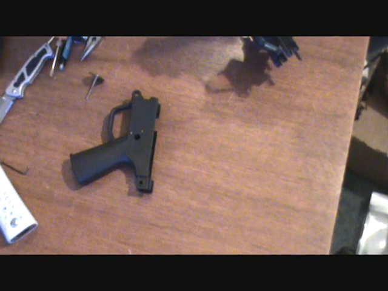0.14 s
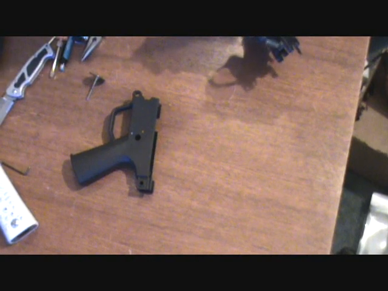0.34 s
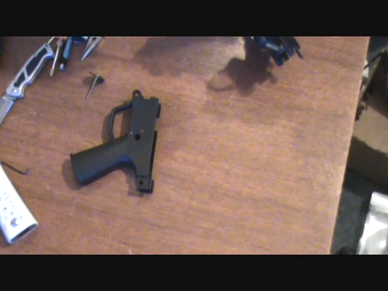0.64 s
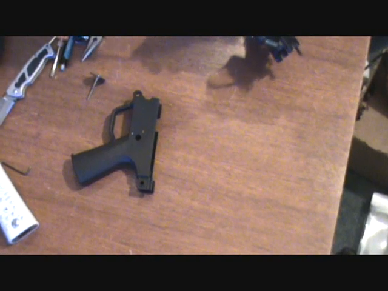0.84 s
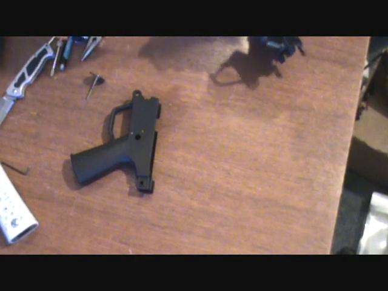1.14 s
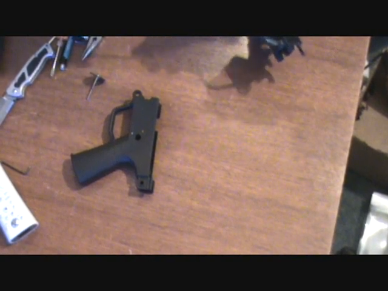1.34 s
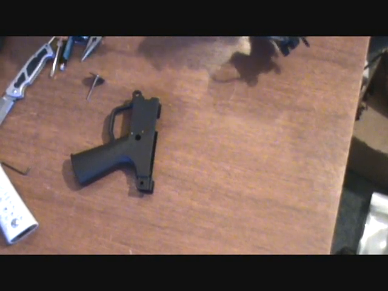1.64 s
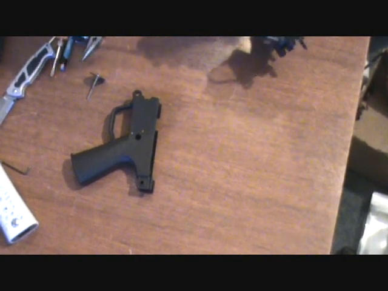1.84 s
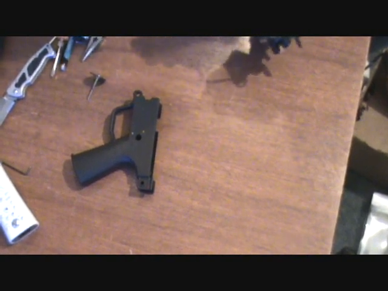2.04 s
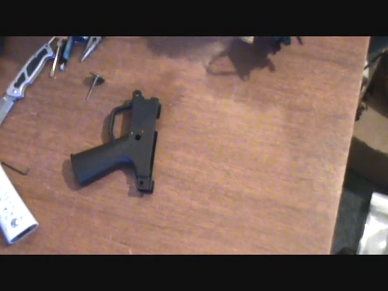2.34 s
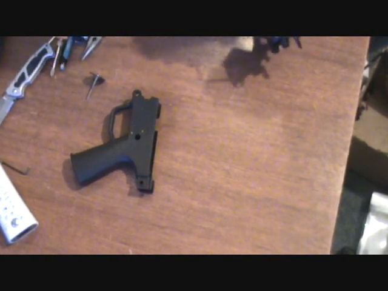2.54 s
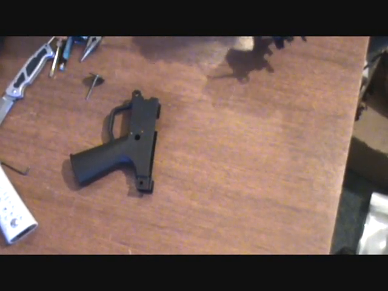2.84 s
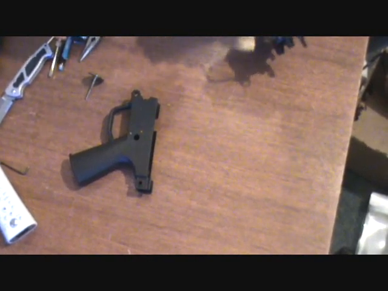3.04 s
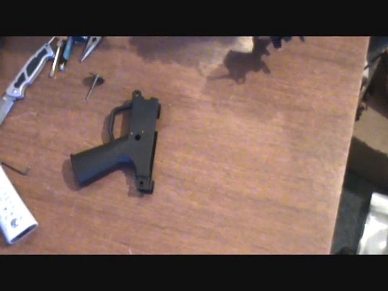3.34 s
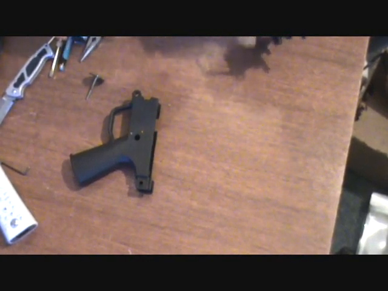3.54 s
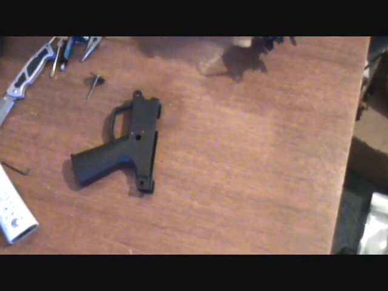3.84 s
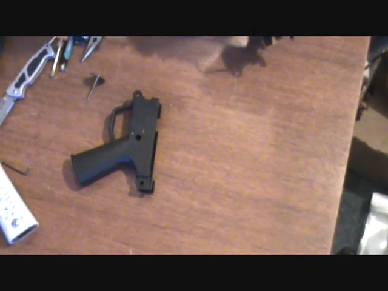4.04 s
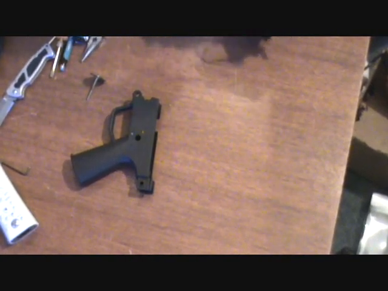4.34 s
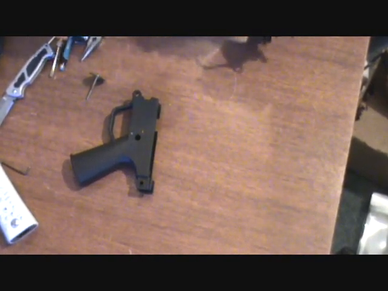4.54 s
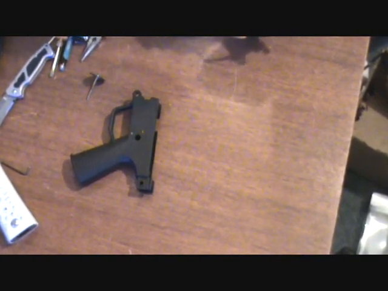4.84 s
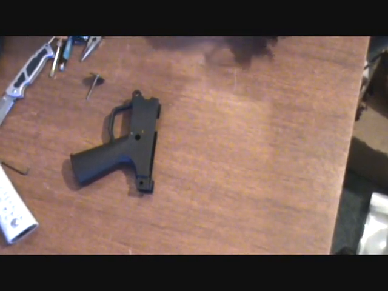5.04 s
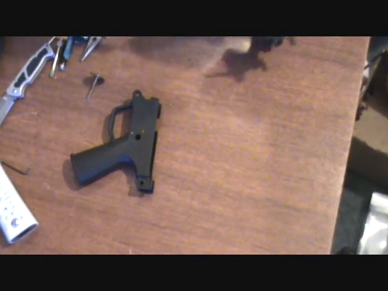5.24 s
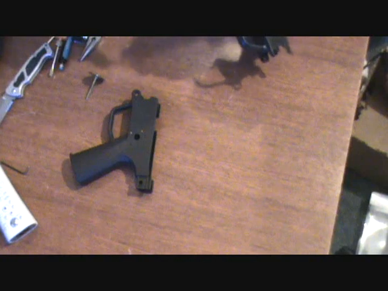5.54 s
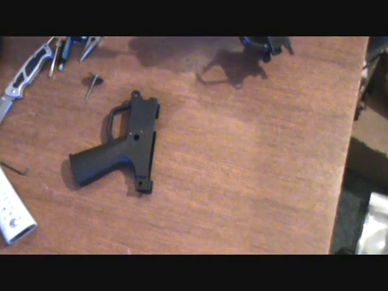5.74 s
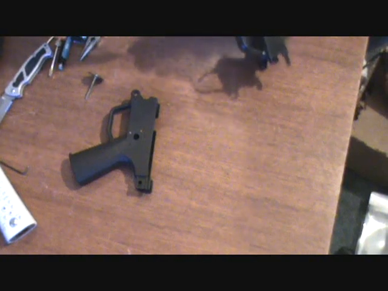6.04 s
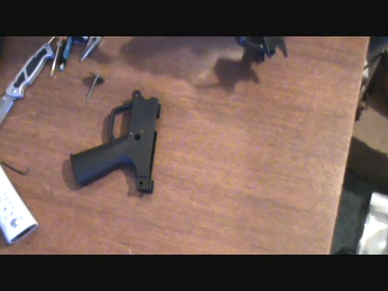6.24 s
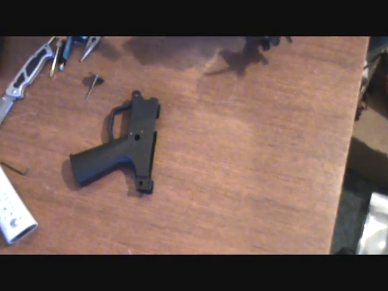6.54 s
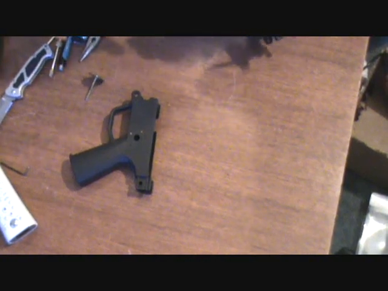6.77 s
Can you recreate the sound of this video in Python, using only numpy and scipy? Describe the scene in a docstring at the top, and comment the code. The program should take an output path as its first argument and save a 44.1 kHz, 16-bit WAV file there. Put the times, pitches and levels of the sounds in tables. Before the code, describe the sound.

A quiet small room with a steady, wide computer-fan rush, faint unsteady motor tones and light hiss. Close up, hands handle hollow steel parts over a wooden table. After a faint slide and finger rustle, a sharp bright click lands at 0.8 s, then clicks at about 1.6 and 1.8. A far vehicle's low hum swells slightly, then is gone by 3.2. A soft table knock and thud come at 2.2. From 2.7 to 3.2 scrapes and clicks crowd together; a strong hollow snap follows at 3.4 and another click at 3.75. Firm clicks fall at 4.5, 4.7 and 4.8. Between 5.0 and 5.25 there is a quick rattle of small ticks and a slide ending in a hard click, with a faint bump. Things calm, with a soft thud near 6.0, a small cluster of light ticks at 6.2-6.4, and faint scraping to the end at about 7.

```python
"""Steel parts at a wooden table

Close by, in a small room, hands fit steel rifle parts together above a wooden table. Filtered slips make
the slides; spikes and damped modes make the ticks and sharp clicks, which bounce off table top and walls.
Shaped noise and unsteady tones make a computer fan nearby; a gliding tone and low noise, a vehicle far
outside. Soft table bumps are decaying low noise, and the fingers' grip is grainy hiss."""
import sys
import numpy as np
from scipy import signal
from scipy.fft import rfft, irfft, next_fast_len
from scipy.io import wavfile
from scipy.ndimage import map_coordinates

SR = 44100
rng = np.random.default_rng(int(sys.argv[2]) if len(sys.argv) > 2 else 0)


def pcm_store(signal):
    """Save signal as 16-bit PCM."""
    levels = np.round(np.clip(np.atleast_2d(signal), -1, 1) * 32767)
    wavfile.write(sys.argv[1], SR, levels.astype(np.int16).T)


N = 304593
TIME = np.arange(N) / SR  # s
AGE = np.arange(SR // 3) / SR  # time since a contact, s

# steel sliding on steel:
# (start [s], end [s], relative level [dB], boost of the highs [dB])
SLIDES = [(0.219, 0.462, -62.5, -15), (.55, 0.663, -52.5, -5), (1.049, 1.163, -58.5, -10),
          (1.451, 1.555, -53, -11), (1.718, 1.815, -51, -20), (2.379, 2.482, -54, 1),
          (2.686, 2.772, -40.5, -3), (2.826, 2.905, -49, -5), (2.989, 3.147, -42.5, -5.5),
          (3.238, 3.388, -51, -5), (3.569, 3.747, -50.5, -5), (4.027, 4.311, -53, -12),
          (4.407, 4.49, -51, -20), (4.967, 5.068, -52.5, 0), (5.11, 5.234, -43.5, -11),
          (5.32, 5.406, -48.5, -3), (5.46, 5.584, -52, -6), (5.763, 5.845, -52, -7), (5.9, 5.98, -57, -12),
          (6.421, 6.519, -56, -7), (6.692, 6.778, -62, 7)]
# how long the room rings: (frequency [Hz], t60 [s])
ROOM = [(300, 0.22), (1000, 0.27), (2300, 0.22), (5000, 0.22), (9000, .18), (14000, 0.18)]


def amp(db):
    """Decibels to gain."""
    return 10 ** (np.asarray(db) / 20)


def unit(x):
    """x at rms 1."""
    return x / np.sqrt(np.mean(x ** 2) + 1e-20)


def pulse(x):
    """x with energy 1 per channel, averaged over the channels."""
    return x / np.sqrt(np.mean(np.sum(x ** 2, axis=-1)))


def along(points, hz):
    """(Hz, value) points read on a log frequency axis."""
    f, v = np.transpose(points)
    return np.interp(np.log(hz + 1), np.log(f), v)


def fade(t60):
    """A decay that loses 60 dB in t60 seconds."""
    return np.exp(-np.log(1000) * AGE / t60)


def wobble(rate):
    """A smooth random curve, rate knots a second."""
    knots = rng.standard_normal(int(N * rate / SR) + 4)
    return map_coordinates(knots, [TIME * rate])


def coloured(x, db_at):
    """x through the causal (minimum-phase) filter whose gain is db_at(Hz)."""
    size = 2 * next_fast_len(x.shape[-1])
    gain = amp(db_at(np.fft.rfftfreq(size, 1 / SR)))
    cepstrum = irfft(np.log(gain))
    # folding the cepstrum forward in time makes the filter causal
    cepstrum[1:size // 2] *= 2
    cepstrum[size // 2 + 1:] = 0
    response = np.exp(rfft(cepstrum))
    return irfft(rfft(x, size) * response)[..., :x.shape[-1]]


def add(track, s, sound):
    """Mix a stereo sound into the track at s seconds."""
    part = track[:, max(round(s * SR), 0):][:, :sound.shape[1]]
    part += sound[:, :part.shape[1]]


def room_tone(air_db=-54.5, waver_db=1.0, drift=0.84):
    """Fan rush and microphone hiss as one wide noise, with slightly unsteady motor tones."""
    # spectrum of the rush and hiss: (frequency [Hz], relative level [dB per Hz])
    air_spectrum = [(20, -20), (35, -12), (55, -15.5), (86, -15.5), (115, -11), (187, -11), (265, -6.5),
                    (420, -12.5), (650, -13.5), (950, -12.5), (1450, -17.5), (2300, -18), (3200, -21.5),
                    (7500, -27), (10500, -26), (16000, -29)]
    # left-right likeness of that noise: (frequency [Hz], correlation [0 to 1])
    air_likeness = [(50, 0.99), (130, 0.82), (260, 0.81), (520, 0.32), (1000, 0.098), (2200, 0.1),
                    (5000, 0.3), (12000, 0.77)]
    # fan and drive tones: (frequency [Hz], rms level before the waver [dB])
    fan_tones = [(37, -81), (51.8, -64), (70, -82), (264, -73), (466, -77.5), (514, -75.5), (754, -72),
                 (843, -78), (904, -71), (1184, -72.5), (1961, -70.5), (2261, -72.5)]

    def side_db(hz):
        alike = np.clip(along(air_likeness, hz), 0, .995)
        return along(air_spectrum, hz) + 10 * np.log10((1 - alike) / (1 + alike))

    mid_noise, side_noise = rng.standard_normal((2, N))
    mid = coloured(mid_noise, lambda hz: along(air_spectrum, hz))
    side = coloured(side_noise, side_db)
    air = amp(air_db) * unit(np.array([mid + side, mid - side]))
    for hz, db in fan_tones:
        unsteady = min(hz / 900, 1)  # high orders magnify small changes of speed
        phase = 2 * np.pi * hz * TIME + drift * unsteady * wobble(9)
        level = amp(db + waver_db * unsteady * wobble(3.65))
        air += level * unit(np.sin(phase))
    return air


def far_engine(rise_s=0.69, end_s=3.2, fall_s=.3, rumble_db=-62):
    """Only the firing note and a low rumble come through the wall; the note rises, then sags."""
    # the firing note: (time [s], pitch [Hz], level before the fade in and out of earshot [dB])
    firing_note = [(.4, 113, -86), (1, 114.4, -68), (2.1, 121, -65), (2.35, 121.5, -61),
                   (2.7, 110.8, -66.5), (2.95, 108.5, -68)]
    # the rumble through the wall: (frequency [Hz], relative level [dB per Hz])
    rumble_spectrum = [(100, -51), (170, -8.5), (210, 3), (255, 1), (330, -14.5), (700, -28), (2000, -64)]
    s, hz, note_db = np.transpose(firing_note)
    phase = 2 * np.pi * np.cumsum(np.interp(TIME, s, hz)) / SR
    note = amp(np.interp(TIME, s, note_db)) * unit(np.sin(phase))
    noise = rng.standard_normal(N)
    rumble = amp(rumble_db) * unit(coloured(noise, lambda f: along(rumble_spectrum, f)))
    earshot = np.clip(np.minimum(TIME / rise_s, (end_s - TIME) / fall_s), 0, 1)
    return earshot * (note + rumble)


def bumps(thud_t60=0.16, knock_t60=.05, soft_s=0.0012):
    """A padded blow makes the table top thud and knock; each microphone hears it a little differently."""
    # soft bumps on the table: (time [s], thud level [dB], wooden knock level [dB])
    table_bumps = [(2.225, -56, -47), (2.242, -67, -50.5), (2.27, -51, -60), (5.2, -56, -57),
                   (5.972, -58, -56.5), (6.028, -57, -80)]
    # the table top, each: (frequency [Hz], relative level [dB per Hz])
    thud_spectrum = [(60, -49), (130, -6), (190, -4.5), (300, -16.5), (600, -22), (2000, -72)]
    knock_spectrum = [(150, -21), (400, -6.5), (650, -4), (1100, -9.5), (1700, -16.5), (4000, -27.5),
                      (10000, -39)]
    track = np.zeros((2, N))
    for s, thud_db, knock_db in table_bumps:
        thud = thud_spectrum, thud_db, thud_t60
        knock = knock_spectrum, knock_db, knock_t60
        for spectrum, db, t60 in (thud, knock):
            decay = fade(t60) + .3 * fade(along(ROOM, 400))  # the board, then the room
            envelope = decay * (1 - np.exp(-AGE / soft_s))
            shared = rng.standard_normal(len(AGE))
            apart = 0.3 * rng.standard_normal((2, len(AGE)))
            board = coloured((shared + apart) * envelope, lambda hz: along(spectrum, hz))
            add(track, s, amp(db) * np.sqrt(SR / 20) * pulse(board))  # level over 50 ms
    return track


def fingers(grain_db=3, brush_s=0.15):
    """Fingertips shifting their grip on the steel give short swells of grainy hiss."""
    # shifts of grip: (time of the peak [s], level at the peak [dB])
    grip_shifts = [(.1, -61.5), (1.42, -59), (2.06, -57.5), (2.24, -62.5), (2.66, -55.5), (4.01, -57.5)]
    # dry skin on steel: (frequency [Hz], relative level [dB per Hz])
    skin_spectrum = [(1000, -19), (4000, -2), (8000, -4), (11000, -0.5), (15000, -19)]
    grip = np.zeros(N)
    for s, db in grip_shifts:
        grip += amp(db) * np.maximum(1 - 2 * np.abs(TIME - s) / brush_s, 0)
    grains = rng.standard_normal(N) * amp(grain_db * wobble(160))
    hiss = coloured(grains, lambda hz: along(skin_spectrum, hz))
    return grip * unit(hiss)


def in_room(x, blur_db=1.0, blur_t60=0.0062, bounce_db=1, walls_db=-5, tail_db=4, side_db=-8.5,
            build_s=0.0043):
    """Direct sound blurred by the parts around it, a bounce off the table, near walls, diffuse tail."""
    hz, t, z = signal.stft(rng.standard_normal((2, len(AGE))), SR, nperseg=256)
    decay = np.exp(-np.log(1000) * t / along(ROOM, hz)[:, None])
    tail = signal.istft(z * decay, SR)[1][:, :len(AGE)]
    tail = pulse(tail * (1 - np.exp(-AGE / build_s)))

    walls = np.zeros_like(tail)
    delay = rng.uniform(.004, .03, size=8)  # s
    walls[:, (delay * SR).astype(int)] = rng.standard_normal((2, len(delay))) / np.sqrt(delay)

    blur = pulse(rng.standard_normal(tail.shape) * fade(blur_t60))
    mid, side = amp(tail_db) * tail + amp(walls_db) * pulse(walls) + amp(blur_db) * blur
    mid[0] += 1  # the direct sound
    bounce = pulse(rng.standard_normal(len(AGE)) * fade(0.0025))
    lag = int(rng.uniform(0.001186, .0021) * SR)  # the hands move, so the path changes
    mid[lag:] += amp(bounce_db) * bounce[:len(AGE) - lag]
    side = side * amp(side_db)
    return signal.fftconvolve(x[None], np.array([mid + side, mid - side]), axes=1)


def housing_ring():
    """Each contact point shares the blow differently among the hollow housing's modes."""
    # the steel housing, damped by the hand:
    # (frequency [Hz], strength before a random scatter [dB], t60 [s])
    housing_modes = [(1655, -8, 0.079), (1740, -1.5, 0.11), (2190, -2, 0.044), (2190, 1.5, 0.06),
                     (2348, 5, 0.033), (2368, -1.5, 0.071), (2450, -6.5, 0.16), (2604, -2.5, 0.075),
                     (2625, -9.5, 0.073), (2980, -34, .08), (3880, 2, 0.067), (4260, 4, 0.058),
                     (4420, -13, 0.11), (4960, -15, 0.16), (4970, -14, 0.088)]
    hz, db, t60 = np.transpose(housing_modes)[:, :, None]
    strength = amp(db + rng.normal(0, 3, hz.shape)) * rng.choice([-1, 1], hz.shape)
    modes = strength * np.sin(2 * np.pi * hz * AGE) * fade(t60)
    return pulse(np.sum(modes, axis=0))


def hardness(hz, knock_db, ring_db, bright_db):
    """A padded contact is fuller low down and in the housing's band; a small hard one is brighter."""
    low = 1 / (1 + (hz / 1700) ** 4)
    hollow = np.exp(-((hz - 2380) / 520) ** 2)
    high = 1 - 1 / (1 + (hz / 6900) ** 6)
    return knock_db * low + ring_db * hollow + bright_db * high


def slides(catch_rate=240, spread_db=7, ring_db=-15, hollow_db=2, gain_db=-2.0):
    """Sliding faces catch on each other in tiny uneven slips (catch_rate per s) that ring the housing."""
    # sliding friction: (frequency [Hz], relative level [dB per Hz])
    friction_spectrum = [(200, -25), (600, -12), (1200, 0.5), (1750, 4), (2350, 3.5), (3100, -2),
                         (4300, -12), (7000, -8), (9500, -21), (12000, -9), (15000, -34)]
    track = np.zeros((2, N))
    for start, end, db, bright_db in SLIDES:
        length = max(int((end - start) * SR), SR // 20)
        caught = rng.random(length) < catch_rate / SR
        sizes = amp(spread_db * rng.uniform(-2.5, 2.3, length))
        signs = rng.choice([-1, 1], length)
        slips = caught * signs * sizes * signal.windows.tukey(length, .3)
        slips = np.pad(slips, (0, len(AGE)))  # room for the ring
        rasp = pulse(coloured(slips, lambda hz: along(friction_spectrum, hz)))
        ring = pulse(signal.fftconvolve(slips, housing_ring())[:len(slips)])
        rub = coloured(rasp + amp(ring_db) * ring, lambda hz: hardness(hz, 0, hollow_db, bright_db))
        add(track, start, amp(db + gain_db) * np.sqrt(length) * pulse(in_room(rub)))
    return track


def part_ring(t60, count=14):
    """Pins, levers and springs add a different handful of short high modes at every contact."""
    hz = rng.uniform(3500, 10000, (count, 1))
    modes = rng.standard_normal((count, 1)) * np.sin(2 * np.pi * hz * AGE)
    return pulse(np.sum(modes, axis=0) * fade(t60))


def touch(db, firm_db=-41, graze_s=0.0014):
    """A spike, then a few milliseconds of noisy grazing that weakens as blows get firmer than firm_db."""
    graze = pulse(rng.standard_normal(len(AGE)) * AGE * np.exp(-AGE / graze_s))
    return amp(min(firm_db - db, 0)) * graze - signal.unit_impulse(len(AGE))


def contact(db, hollow_db, bright_db, ping_hz, ring_db=-11, part_db=-11, ping_db=5, ping_width_hz=260):
    """One contact rings the housing, small parts and piece struck; the lighter it is, the more it knocks."""
    # a contact of middling hardness: (frequency [Hz], relative level [dB per Hz])
    contact_spectrum = [(120, -37.5), (350, -14), (700, -14), (1200, -6.5), (1750, -4), (2400, -0.5),
                        (3200, -4), (4400, 0.5), (5500, -2), (7300, -1), (9500, -2), (16000, -1.5)]
    # contact time sets a cut-off, higher for a bare edge, which sounds light and bright
    bare_edge = db < -36 and bright_db > 2
    cutoff_hz = 14000 if bare_edge else 9710
    # the fingers pad a light contact, so it knocks lower
    firm_db, firm_knock_db = -27.5, -2.5  # a firm blow and its knock
    padding = 0.44  # dB of knock gained per dB softer
    knock_per_ring = 0.58  # a blow on the housing knocks too: dB of knock per dB of ring
    knock_db = firm_knock_db + padding * (firm_db - db) + knock_per_ring * hollow_db

    def blow_db(hz):
        ping = ping_db / (1 + ((hz - ping_hz) / ping_width_hz) ** 2)  # the piece struck
        softness = -10 * np.log10(1 + (hz / cutoff_hz) ** 14)
        return along(contact_spectrum, hz) + ping + softness

    blow = pulse(coloured(touch(db), blow_db))
    small_parts = part_ring(.04)  # the hand damps them quickly
    steel = blow + amp(ring_db) * housing_ring() + amp(part_db) * small_parts
    steel = coloured(steel, lambda hz: hardness(hz, knock_db, hollow_db, bright_db))
    return amp(db) * np.sqrt(SR / 20) * pulse(in_room(steel))  # level over 50 ms


def ticks(hollow_db=7, low_hz=4200, high_hz=8500):
    """As the parts slide, their edges knock together lightly at uneven moments."""
    rate = 18  # per s
    offset_db, scatter_db = -4, 0.5  # against the slide's tabled level
    track = np.zeros((2, N))
    for start, end, db, bright_db in SLIDES:
        count = max(round((end - start) * rate), 1)
        for k in range(count):
            s = start + (end - start) * (k + rng.random() / 2) / count
            tick_db = db + offset_db + scatter_db * rng.standard_normal()
            ping_hz = rng.uniform(low_hz, high_hz)
            add(track, s, contact(tick_db, hollow_db, bright_db, ping_hz))
    return track


def clicks():
    """Parts meet and snap home, each contact a blow that sets steel ringing."""
    # steel contacts: (time [s], level over 50 ms [dB], boost of the housing's band [dB],
    # boost of the highs [dB], resonance of the piece struck [Hz])
    steel_contacts = [(0.544, -52, 3, -7, 7500), (.7734, -27, 1, 5.5, 7300), (1.159, -49.5, 13, -7, 6100),
                      (1.168, -45.5, -0.5, -9, 6100), (1.5506, -45.5, 9, -2, 6900),
                      (1.5621, -30, 0, -9, 6900), (1.8076, -46.5, 8, -7, 7300),
                      (1.819, -26.5, 2.5, 3, 7300), (2.128, -42, 9.5, -3, 8900),
                      (2.3605, -50.5, 5.5, -7, 6400), (2.422, -48, 4.5, 1.5, 5200),
                      (2.699, -43.5, 18, -2, 7000), (2.71, -39.5, 11, -4.5, 8250),
                      (2.7578, -39.5, -5, -8, 6200), (2.766, -31.5, 0.5, -6, 6140),
                      (2.9527, -31.5, 2.5, -7, 6480), (3.0286, -43, 5, -2, 8800),
                      (3.0433, -31.3, 0.5, -1, 4360), (3.156, -30, 5, 0.5, 4170),
                      (3.3872, -44.5, 20, -19, 8200), (3.3972, -24.5, 11.5, 2, 8500),
                      (3.7453, -28, -0.5, -1.5, 6550), (4.0482, -47, 9.5, -10, 7700),
                      (4.0759, -52, 1, -16, 6400), (4.4075, -43, 10.5, -20, 4140),
                      (4.4551, -47.5, 14, -21, 4200), (4.492, -24.5, -6, -1, 6650),
                      (4.6771, -27, 4.5, -0.5, 8500), (4.7894, -38.5, 9, -11, 7750),
                      (4.8052, -28, 0, -0.5, 6200), (5.0163, -47.5, 6, -32, 6200), (5.08, -44, 2, -5, 5800),
                      (5.104, -44, 6, -1, 6840), (5.115, -42, -1, -1, 6900), (5.1224, -42.5, 2, -3, 6300),
                      (5.146, -41.5, 8, 1, 4200), (5.1686, -39, 2, -8, 4200), (5.2093, -44, 4, -14, 7500),
                      (5.2384, -26, -2.5, -0.5, 9540), (5.356, -46.5, 15, -8, 4195),
                      (6.2135, -45.5, 1, -16, 10100), (6.2257, -43.5, 0, 8, 4500),
                      (6.248, -38.5, 3, -6, 4400), (6.3109, -41.5, 9.5, 0, 4470),
                      (6.387, -51, 4, -16, 6200), (6.7058, -53, 4, -11, 5900)]
    track = np.zeros((2, N))
    for s, *blow in steel_contacts:
        add(track, s, contact(*blow))
    return track


def scene():
    """The quiet room, and the handwork in front of the microphone."""
    background = room_tone() + far_engine()
    handwork = bumps() + fingers() + slides() + ticks() + clicks()
    return background + handwork


def record(dry, top_hz=16000):
    """Nothing sounds from top_hz upwards."""
    size = next_fast_len(N + SR // 2)
    kept = np.fft.rfftfreq(size, 1 / SR) < top_hz
    return irfft(rfft(dry, size) * kept, size)[:, :N]


dry = scene()
out = record(dry)
pcm_store(out)
```